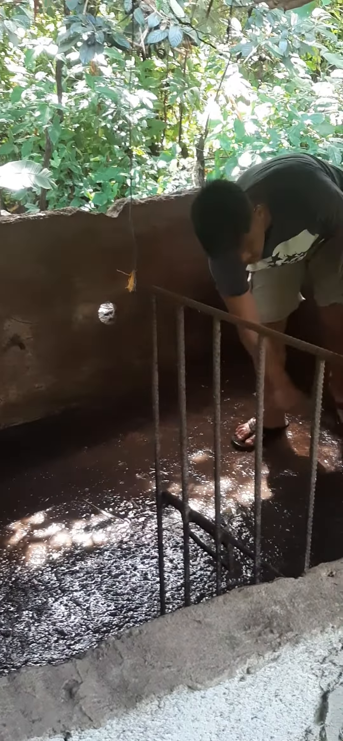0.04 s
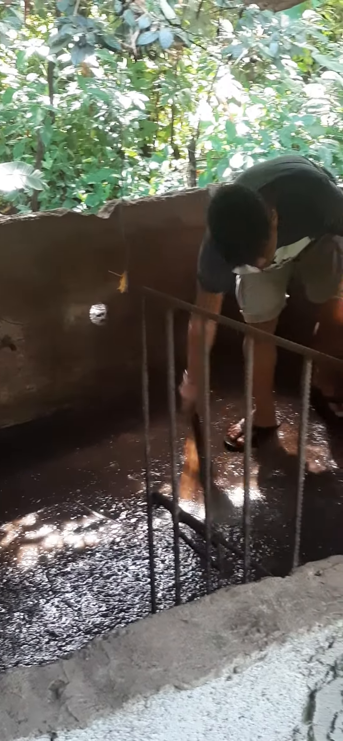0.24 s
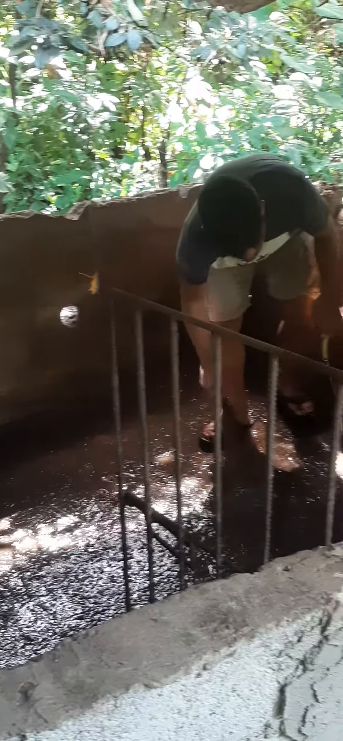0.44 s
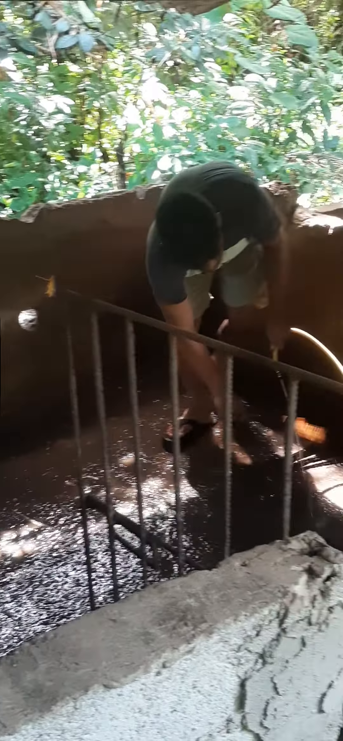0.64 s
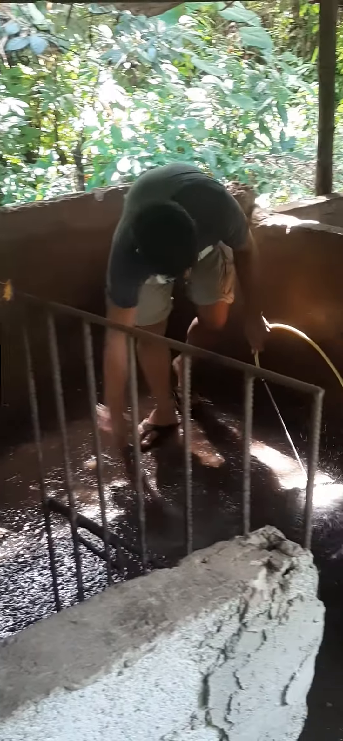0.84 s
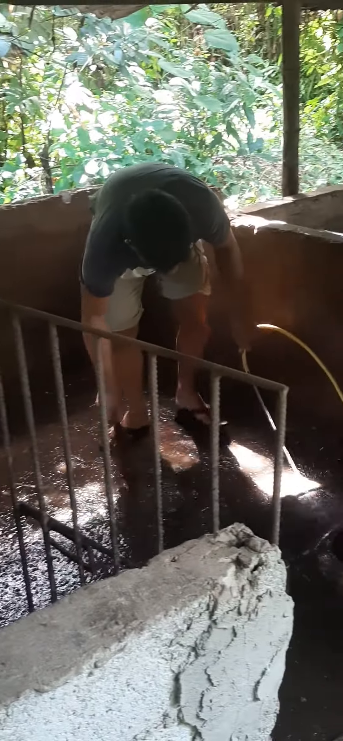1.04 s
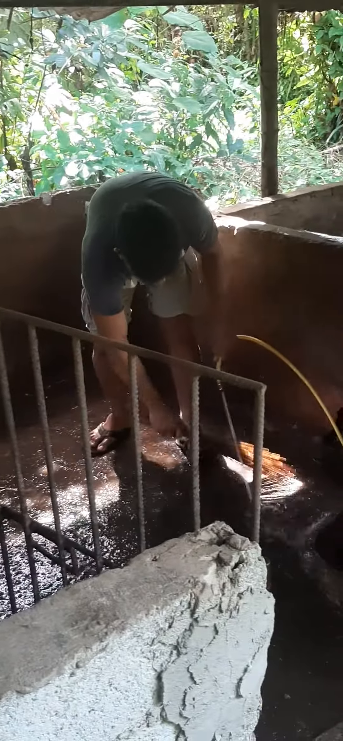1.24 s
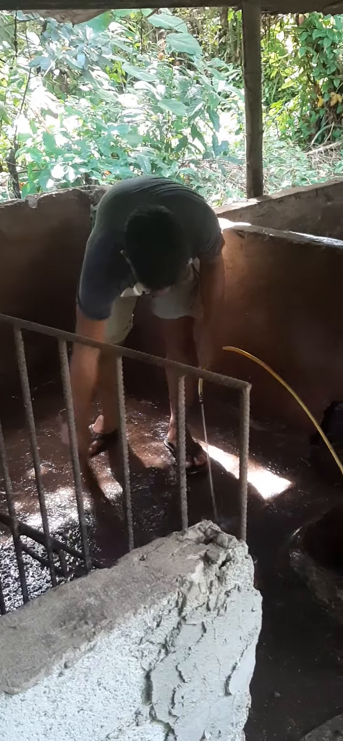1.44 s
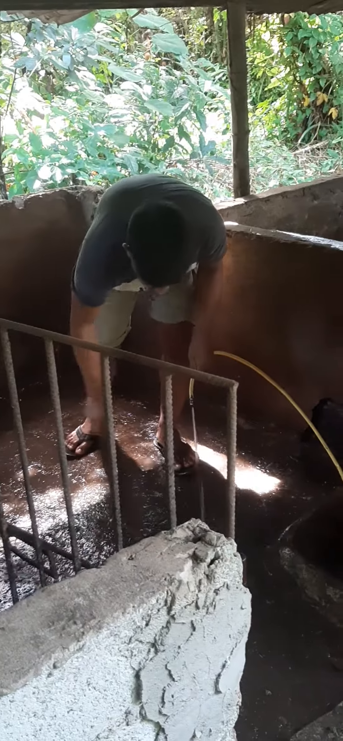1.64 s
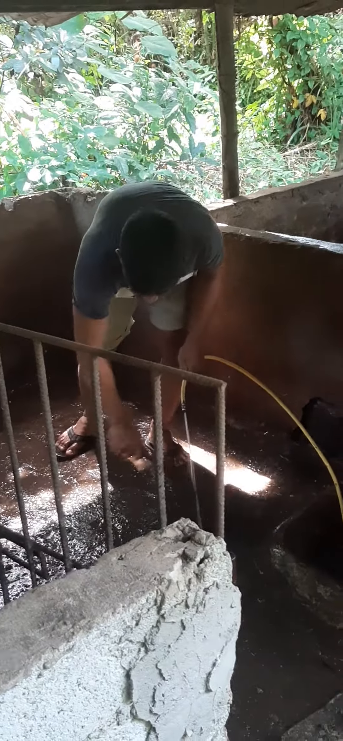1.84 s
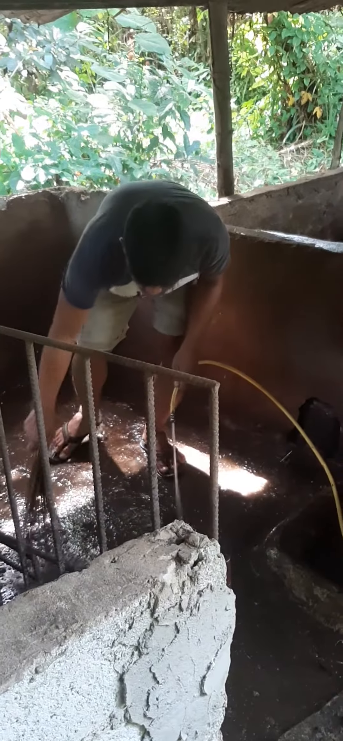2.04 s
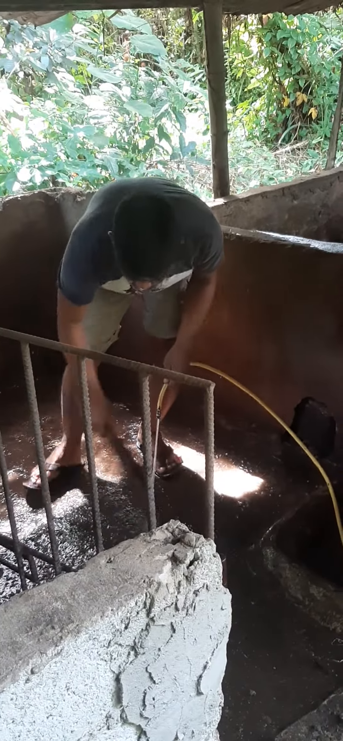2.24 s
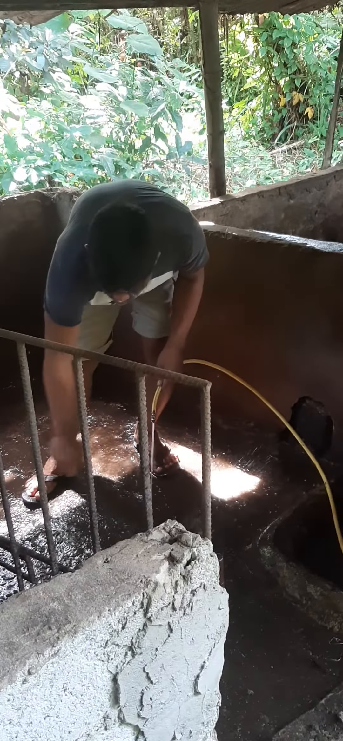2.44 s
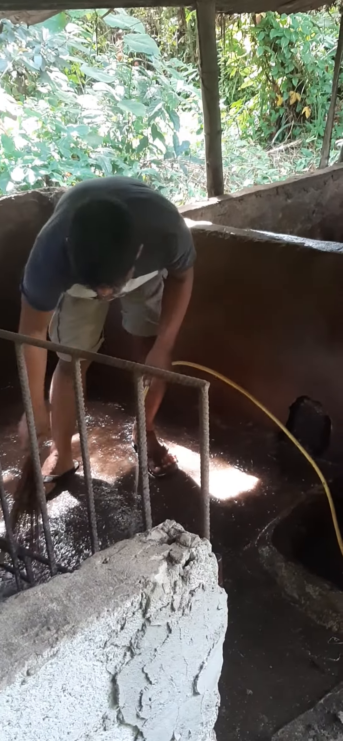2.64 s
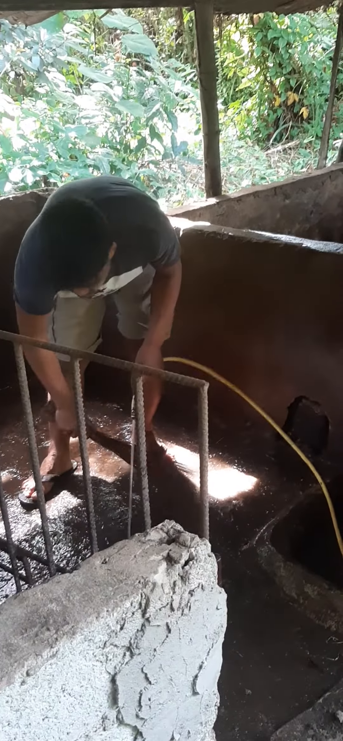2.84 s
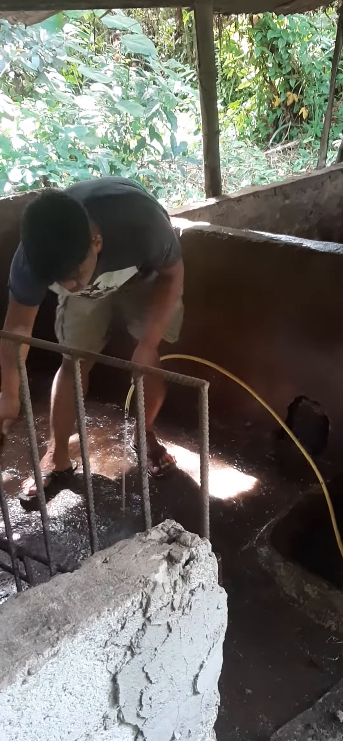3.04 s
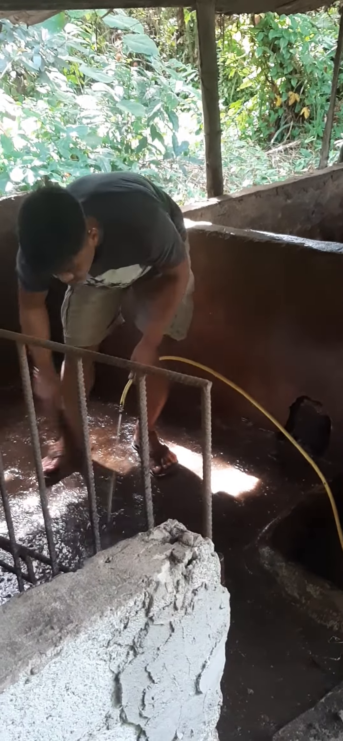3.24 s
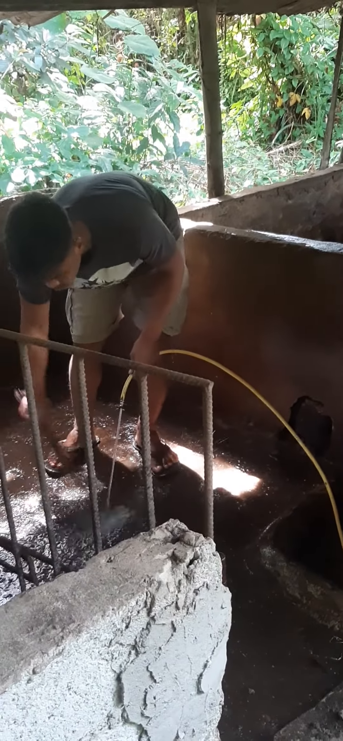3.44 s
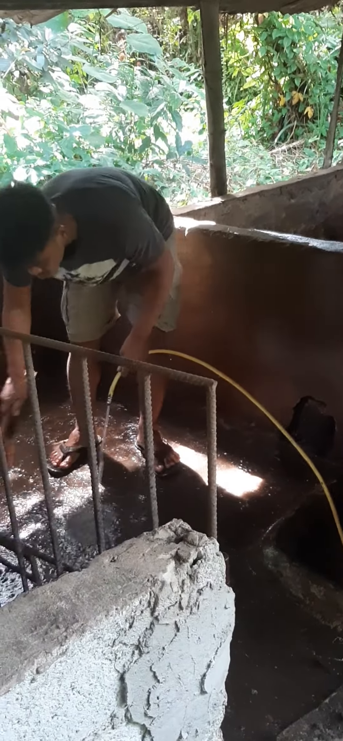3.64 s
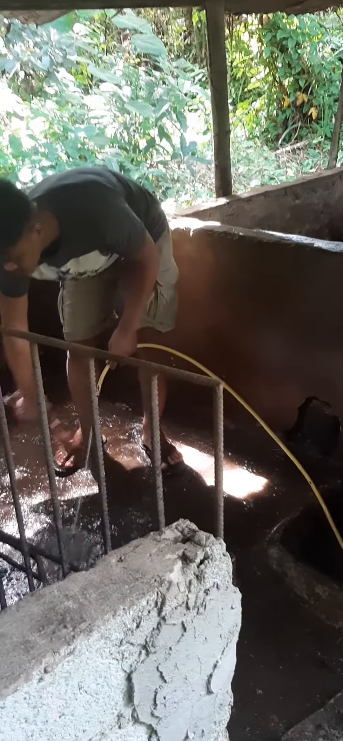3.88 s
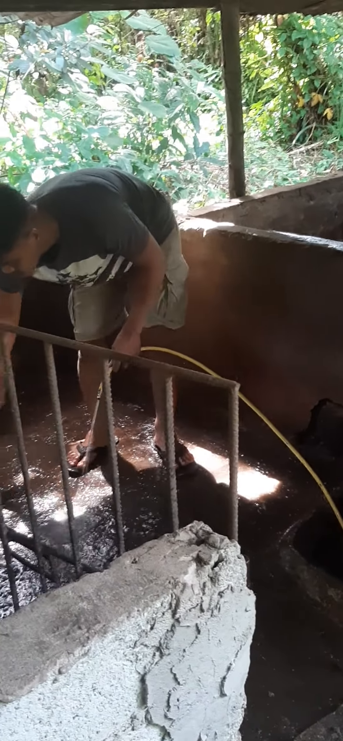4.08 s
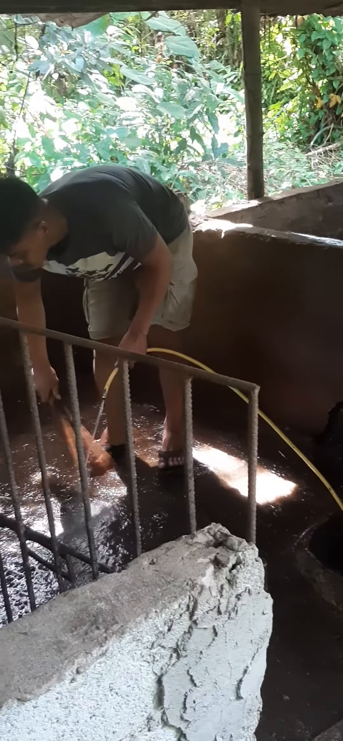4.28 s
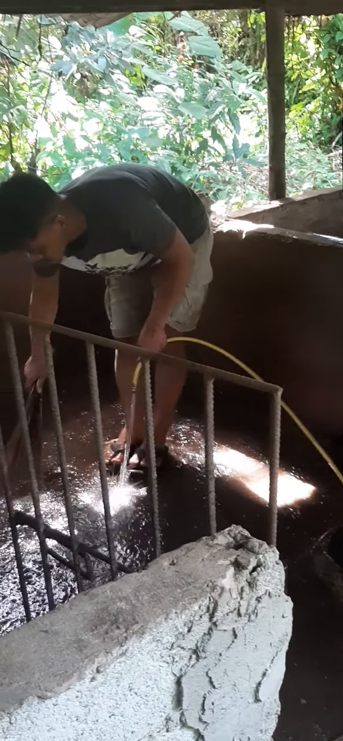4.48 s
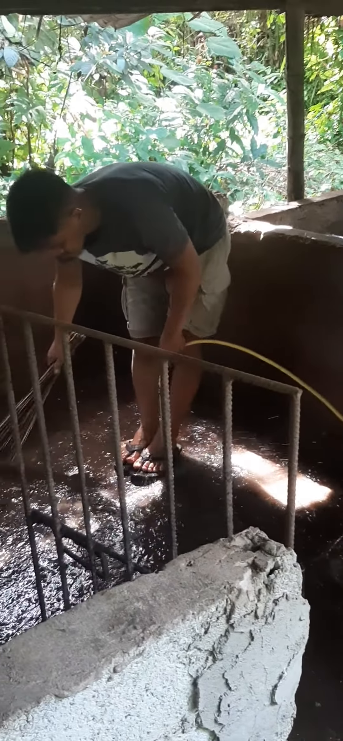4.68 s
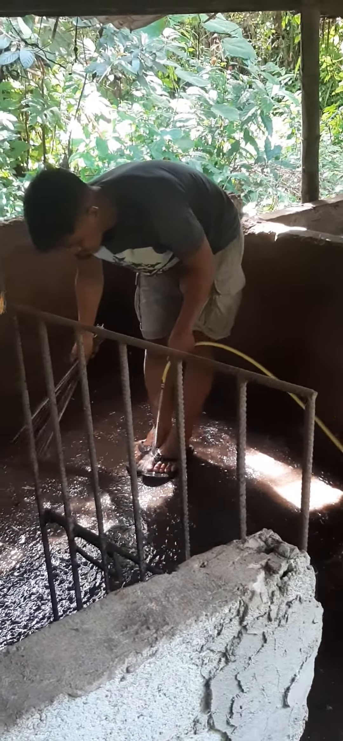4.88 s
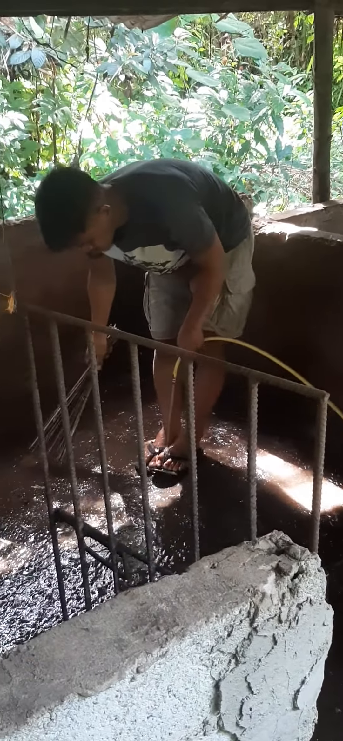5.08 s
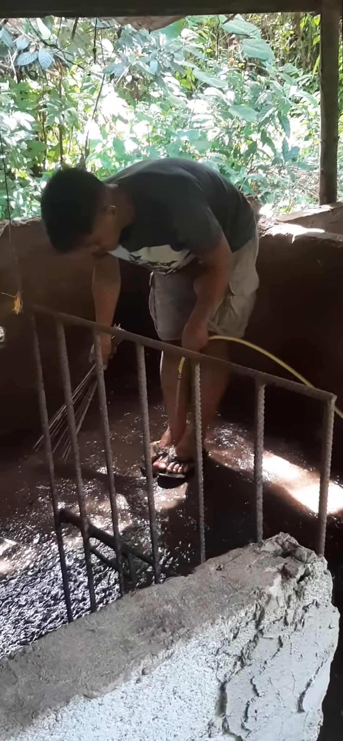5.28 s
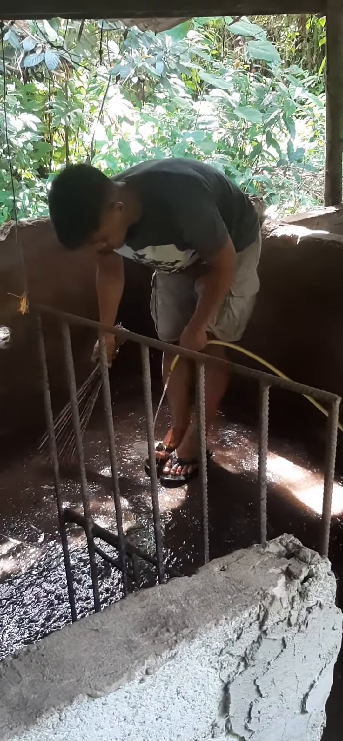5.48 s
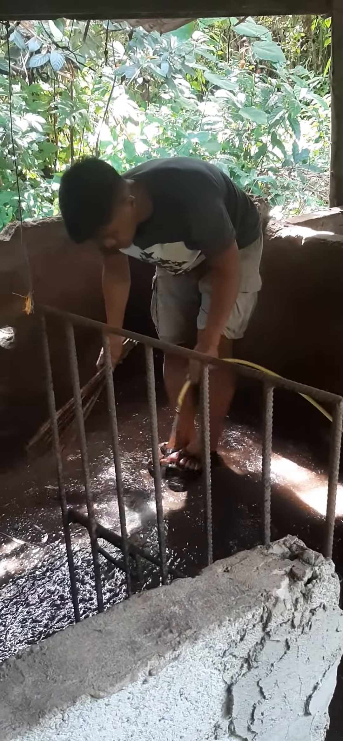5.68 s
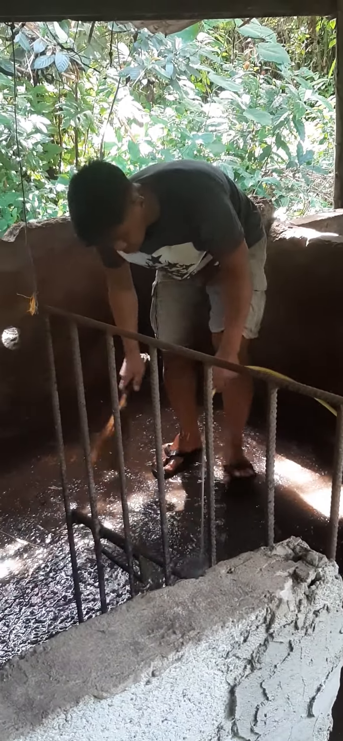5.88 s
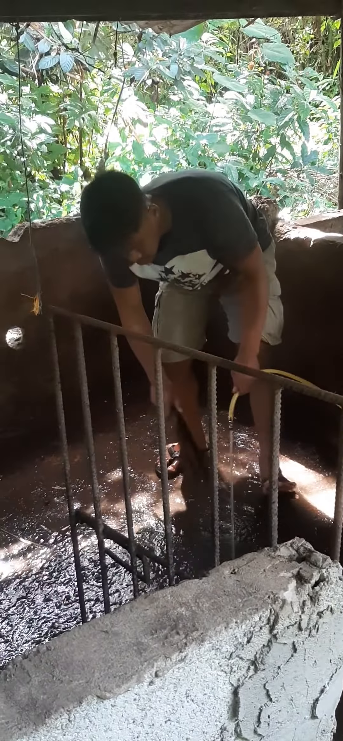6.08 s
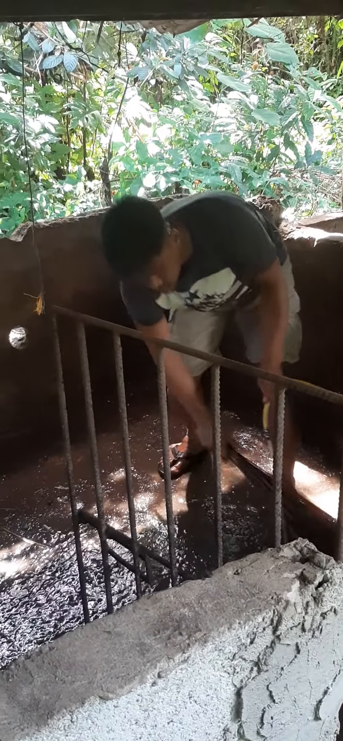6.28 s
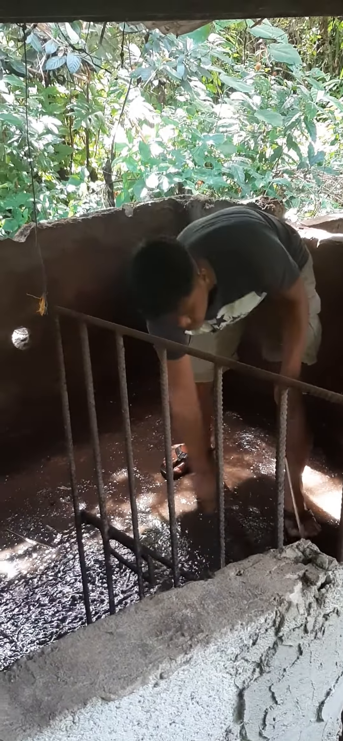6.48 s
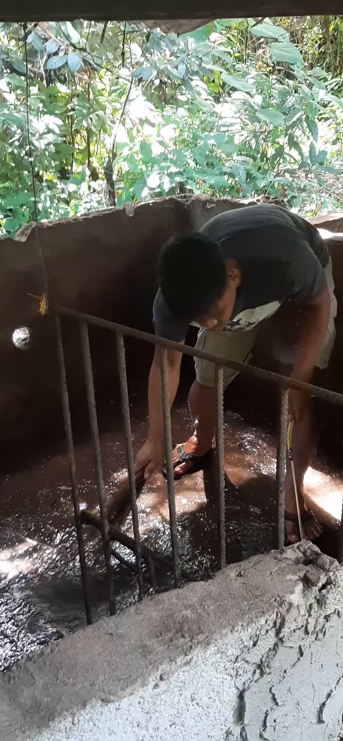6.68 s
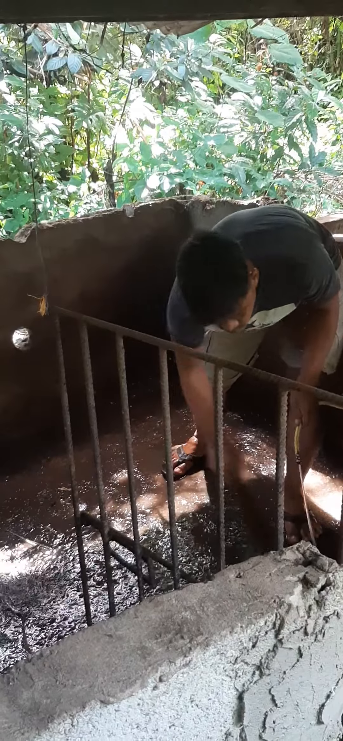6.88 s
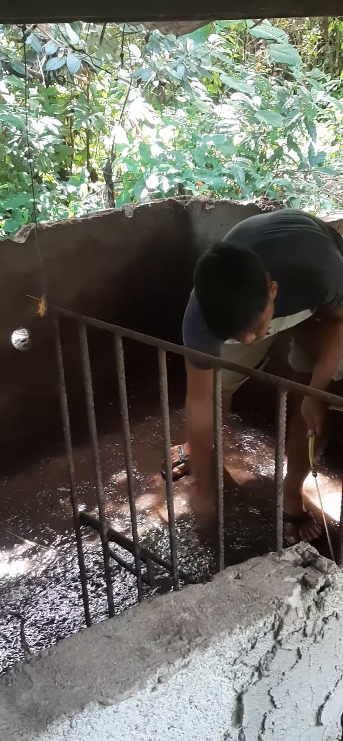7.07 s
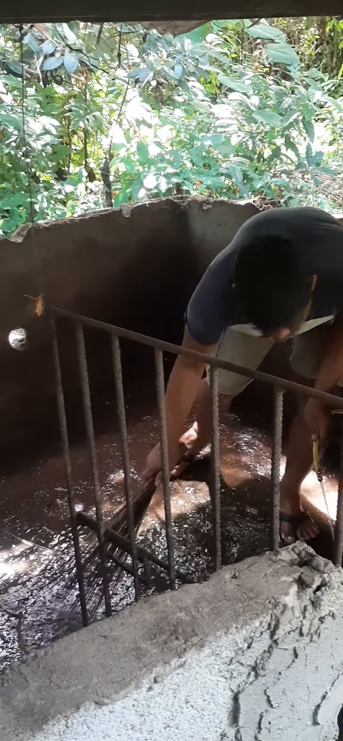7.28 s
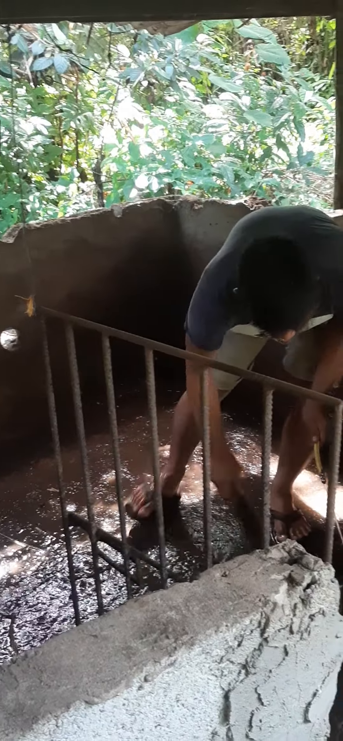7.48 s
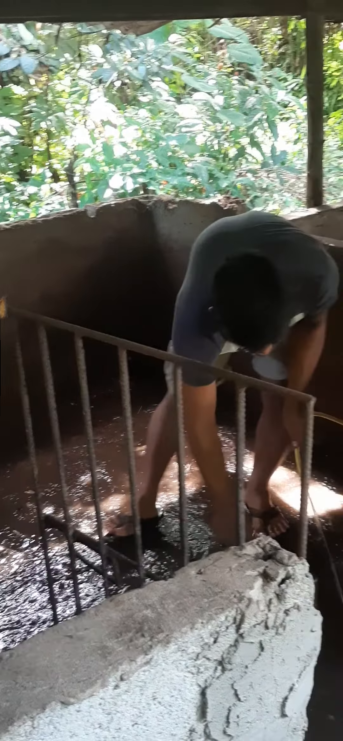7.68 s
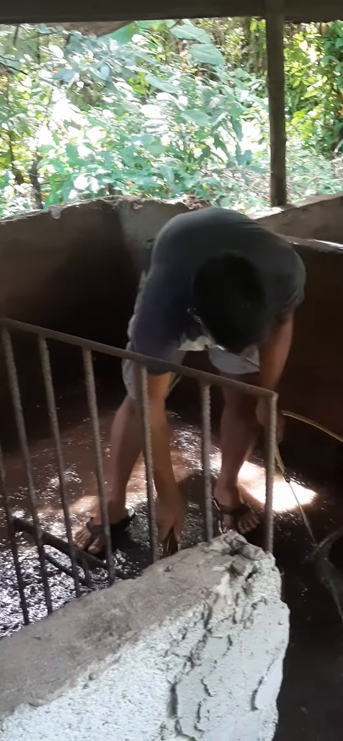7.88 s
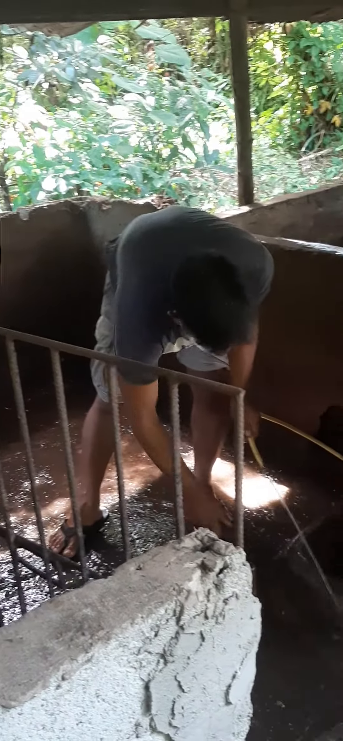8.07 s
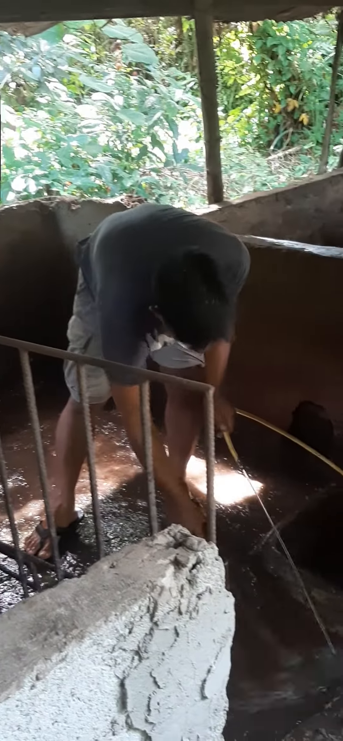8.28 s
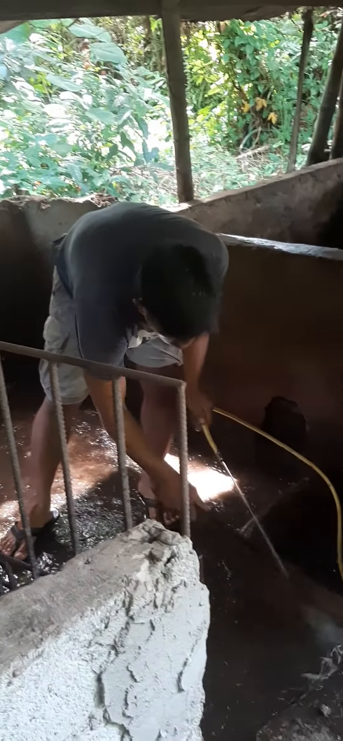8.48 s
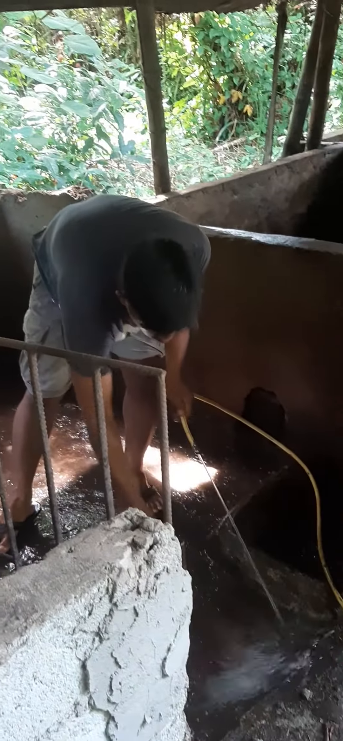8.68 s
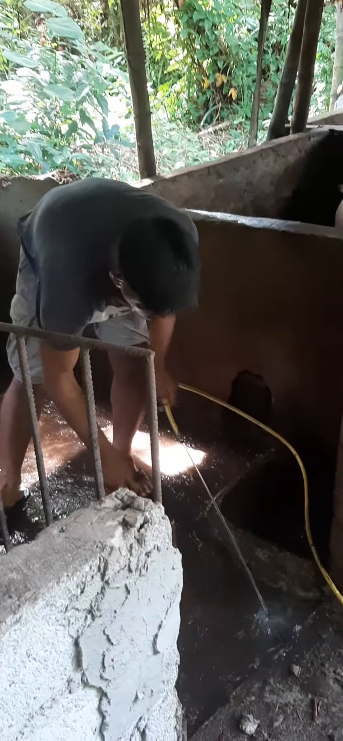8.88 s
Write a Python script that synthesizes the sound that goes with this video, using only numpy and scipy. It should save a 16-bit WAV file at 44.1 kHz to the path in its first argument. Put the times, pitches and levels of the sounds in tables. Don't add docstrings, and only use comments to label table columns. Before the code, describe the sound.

A stick broom scrubs wet concrete inside a small hard-walled pen, close to a handheld stereo microphone. From 0 to 4.6 s come nine dry, bright, hissing strokes, first about 0.6 s apart, then nearer 0.5 s; each swells fast and fades into a scrape, some with a soft return brush between. Low air puffs bump the left side on some strokes. Beneath runs a constant pump hum near 120 Hz, its casing ringing with a fast mechanical rattle, plus dull hose drumming, fine spray and a faint high insect hiss. From about 4.7 to 6.4 s the broom stops; the background rises strongly, peaking near 6.2 s, with hollow jet booms on the wall and low thuds around 5.9 and 6.04 s. It drops abruptly as strokes return at 6.45, 6.97, 7.7, 8.15 and 8.6 s, with another water boom near 8.1 s.

```python
import sys
import numpy as np
from scipy import signal
from scipy.fft import rfft, irfft, next_fast_len
from scipy.io import wavfile

SR = 44100
rng = np.random.default_rng(int(sys.argv[2]) if len(sys.argv) > 2 else 0)


def unload_audio(sound):
    columns = np.transpose(np.atleast_2d(sound))
    steps = np.round(np.clip(columns, -1, 1) * 32767)
    wavfile.write(sys.argv[1], SR, steps.astype(np.int16))


def invert_db(x):
    u = np.asarray(x, float) / 20
    return 10 ** u


N = 393372
HZ = np.fft.rfftfreq(next_fast_len(N), 1 / SR)
T = np.arange(N) / SR
SLOW_T = T[::64]
SHAFT_HZ = 29.39

# (time [s], level [dB])
GAIN = [(0.0, -45), (0.45, -48), (1.3, -47), (2.2, -46), (3.2, -46), (3.8, -46), (4.9, -46.5), (5.3, -44.5),
        (5.75, -40.5), (6.2, -36), (6.48, -37), (6.58, -46.5), (6.95, -45.5), (7.5, -46.5), (8.0, -45),
        (8.92, -44)]
# (frequency [Hz], level [dB])
HUM_TONES = [(119.6, 0.5), (149.8, -17.5), (179.5, -15.5), (241, -18), (323, -15)]
CASING_HZ = [479, 530, 612, 802, 860, 960, 1320, 1502, 1853, 1890, 1965, 2013, 2050, 2095, 2480, 2750, 2950,
             3612, 4225]
# (width [Hz], level [dB], left over right [dB], left-right lag [rad])
CASING_MODES = [(14, -14.5, -14, 0.3), (57.4, -14, -6, 1), (16.8, -8, -9.5, 1.5), (15.2, -4, 4, -3),
                (18, -11, 12.5, -2.5), (45, -23.5, 22.5, 2.5), (19.7, -23, 29.5, -3), (15, -5.5, 4, -5),
                (25.2, -4.5, 1, 1.04), (40, -6.5, 5, 2.5), (40, -4, -15, 2.5), (39.6, -2.5, -13.5, 0.76),
                (30, -1, 4, -2.5), (50, -11, -9, 1.3), (70, -10.5, 2, 2.15), (66.5, -5.5, -9, 0.4),
                (146, -15, 0, 0.9), (60, -5, 1.5, 2), (170, -13, 3, 1.46)]
# (frequency [Hz], density [dB per Hz])
WATER_COLOUR = [(60, -12), (150, 7), (280, -16), (340, 6), (520, -1), (720, -0.5), (900, 0.5), (1080, 1),
                (1500, 3.5), (3000, -3), (3880, -7), (4600, -24), (6000, -33)]
# (frequency [Hz], likeness [0 to 1])
WATER_LIKENESS = [(60, 0.51), (130, 0.79), (320, 0.57), (500, 1), (1100, 0.16), (2500, 0.2)]
# (frequency [Hz], density [dB per Hz])
SPRAY_COLOUR = [(3000, -9), (3850, 11), (5000, -2), (6300, 7), (8000, 21), (9500, -33), (12000, -4),
                (17000, 7)]
# (frequency [Hz], width [Hz], level [dB])
INSECT_BANDS = [(7100, 200, -6), (7610, 260, 5), (8300, 130, -1)]
# (frequency [Hz], density [dB per Hz])
RUMBLE_COLOUR = [(15, -25), (35, -17), (55, -6), (90, 2.5), (140, -20.5)]
# (time [s], half length [s], hum change [dB], rumble swell [dB])
GUSTS = [(0.2, .12, -4, 10), (0.82, .12, -4, 12), (1.45, 0.13, -3, 4), (1.97, .08, -4, 2),
         (2.51, .06, -1, 2), (3.02, .09, -5, 6), (3.53, 0.14, -5, 7), (4.02, 0.083, -3, 4),
         (4.58, .06, 1, 8), (5.95, .15, 1.5, 5), (6.33, 0.091, 1, 9), (6.6, 0.073, -3, 1),
         (7.13, .1, -2, 3), (7.62, .06, 2, 5), (7.73, .04, -1.5, 8), (8.15, 0.22, -1.5, 8)]
# (time [s], half length [s], drumming swell [dB], boom swell [dB])
JET_SWINGS = [
    (5.3, .15, 1.5, 2),
    (5.93, 0.21, 2, 6),
    (6.15, 0.24, 2.5, 15),
    (7.12, .08, -1.5, 6),
    (7.97, .07, 2, 9),
    (8.12, 0.19, 1.5, 11.5),
]
# (frequency [Hz], density [dB per Hz])
HISS_COLOUR = [(4000, -41), (7000, -7.5), (9000, -5), (11300, 8.5), (13000, 4.5), (14500, 3.5),
               (16000, -4.5)]
# (frequency [Hz], density [dB per Hz])
SCRAPE_COLOUR = [(2000, -54), (3800, -2.5), (4600, 2), (7500, -1), (9000, -1), (12000, -27)]
# (frequency [Hz], density [dB per Hz])
STICKS_COLOUR = [(500, -47), (1300, -13.5), (2000, -2.5), (3000, 0), (3700, -7), (6000, -38)]
# (touch-down [s], rise [s], fall [s], peak [dB], fall shape [2 round, 4 flat-topped])
STROKES = [(0.06, 0.088, 0.23, -24, 5.3), (0.683, 0.12, .23, -23.5, 2.55), (1.305, 0.1, .25, -23, 1.45),
           (1.872, .12, 0.19, -23.5, 2.6), (2.412, 0.12, 0.17, -22.5, 1.86),
           (2.915, 0.057, 0.19, -23, 2.65), (3.408, 0.12, 0.13, -22, 2.4), (3.885, 0.16, 0.14, -22.5, 1.3),
           (4.352, 0.055, 0.2, -28, 2), (6.446, 0.045, .25, -23.5, 4.5), (6.965, 0.19, 0.17, -23.5, 2.3),
           (7.697, 0.043, 0.19, -24.5, 4.3), (8.143, 0.15, 0.11, -28, 1.9), (8.6, 0.11, 0.12, -24, 1.2)]
# (touch-down [s], peak [dB])
RETURNS = [
    (-0.06, -46),
    (1.725, -35.5),
    (2.28, -31.5),
    (2.79, -40.5),
    (3.28, -38.5),
    (3.74, -38),
    (7.58, -36.5),
    (8.48, -36.5),
]
# (time [s], half length [s], hiss change [dB], scrape change [dB], sticks change [dB])
LEANS = [(0.15, .05, 2, -1, 2), (0.70, .02, 3, 2.5, 7), (0.80, 0.066, 1, -2.5, -3.5),
         (1.44, 0.081, 0.5, 1, 4), (1.55, 0.064, 4.5, 6.5, 6.5), (1.98, .08, 1.2, 0.5, .6),
         (2.52, .03, 1, -2, 0), (2.97, .03, 0, 2.5, 3.5), (3.285, .006, 9, 5, 6), (3.95, 0.077, -0.5, 3, 4),
         (4.09, .04, -4.5, -3.5, 1.5), (4.38, 0.043, 2.5, 2.5, 7.5), (6.372, .005, 10, -6, -3),
         (6.5, .03, 0, 1.5, 8.5), (6.56, .025, 2, -6, -6), (6.65, 0.078, -2.5, 3, 9),
         (7.015, 0.024, -5, -12, 2), (7.2, 0.06, -1.5, 1.5, 1.5), (7.72, .015, 3, -2, -5),
         (7.82, 0.06, -2.5, -1.5, 1.5), (8.11, .006, 7, 12, 5), (8.68, .03, 3.5, 1.5, 2)]
# (time [s], peak [dB])
PUFFS = [(0.15, -39), (0.159, -35), (0.182, -38), (0.242, -39), (0.792, -31.5), (.83, -40), (1.42, -41),
         (1.97, -40), (2.499, -46), (2.518, -31.5), (3.03, -40), (3.549, -41), (3.986, -29.5), (7.725, -34)]
# (time [s], peak [dB], pitch [Hz], half length [s])
BUMPS = [
    (1.27, -52, 65, .02),
    (2.707, -41, 85, 0.015),
    (3.912, -44, 90, .012),
    (4.59, -53, 60, .02),
    (5.665, -49, 65, .02),
    (5.89, -40, 75, .05),
    (6.04, -40, 62, 0.056),
    (6.585, -49, 60, .02),
    (7.616, -51, 60, .03),
    (8.126, -47, 60, 0.036),
]
# (frequency [Hz], gain [dB])
PORT_RESPONSE = [(6000, 1), (8000, 0.5), (8380, -9), (8850, -9.5), (9200, -3), (10500, -3), (15750, 5),
                 (15950, -37)]


def evened(x):
    return x / np.sqrt(np.mean(x ** 2) + 1e-20)


def read(points, hz=HZ):
    f, value = np.transpose(points)
    return np.interp(np.log(hz + 1), np.log(f + 1), value)


def filtered(x, response):
    size = next_fast_len(N)
    return irfft(rfft(x, size) * response, size)[..., :N]


def mode(hz, width):
    return 1 / (1 + 2j * (HZ - hz) / width)


def wander(hz):
    coarse = rng.standard_normal(N // 64 + 2)
    f = np.fft.rfftfreq(len(coarse), 64 / SR)
    smooth = irfft(rfft(coarse) / (1 + (f / hz) ** 2), len(coarse))
    return evened(np.interp(T, np.arange(len(coarse)) * 64 / SR, smooth))


def noise_pair(same):
    a, b = rfft(rng.standard_normal((2, next_fast_len(N))))
    same = np.clip(same, 0, 1)
    right = same * a + np.sqrt(1 - same ** 2) * b
    return irfft([a, right], next_fast_len(N))[:, :N]


def power_sum(levels_db):
    return 10 * np.log10(np.sum(invert_db(np.asarray(levels_db)) ** 2, axis=0))


def swells(rows):
    s, half, *columns = np.transpose(rows)
    bump = np.exp(-2 * ((SLOW_T[:, None] - s) / half) ** 2)
    return [np.interp(T, SLOW_T, bump @ c) for c in columns]


def hum():
    tones = np.zeros(N)
    for hz, db in HUM_TONES:
        phase = 2 * np.pi * hz * T + 0.12 * wander(5.2) + 6 * rng.random()
        tones += invert_db(db + 0.36 * wander(9.1)) * np.sin(phase)
    return np.sqrt(2) * tones * invert_db(np.array([[1.4], [-1.6]]))


def casing():
    turn = 2 * np.pi * SHAFT_HZ * T + 0.38 * wander(2.02)
    throb = 1 + 0.12 * np.cos(turn) + 0.05 * np.cos(2 * turn)
    knocks = np.diff(np.floor(turn / (2 * np.pi)), prepend=0)
    drive = throb * noise_pair(0.85) + 0.3 * evened(knocks)
    side = np.array([[.5], [-.5]])
    body = 0
    for hz, (width, db, pan_db, lag) in zip(CASING_HZ, CASING_MODES):
        body = body + invert_db(db + side * pan_db) * abs(mode(hz, width)) ** 2 * np.exp(-1j * side * lag)
    return evened(filtered(drive, body))


def water():
    beat = 1 + 0.11 * np.cos(4 * np.pi * SHAFT_HZ * T)
    gusts = invert_db(0.95 * wander(32)) * beat
    return evened(filtered(gusts * noise_pair(read(WATER_LIKENESS)), invert_db(read(WATER_COLOUR))))


def air():
    return evened(filtered(invert_db(1.1 * wander(11)) * noise_pair(0.94), invert_db(read(RUMBLE_COLOUR))))


def wall():
    boom = abs(mode(243, 41)) ** 2 + 0.74 * abs(mode(319, 50)) ** 2 + 0.43 * abs(mode(216, 55)) ** 2
    return evened(filtered(noise_pair(0.82), boom))


def spray():
    return evened(filtered(invert_db(2.7 * wander(30)) * noise_pair(0.), invert_db(read(SPRAY_COLOUR))))


def insects():
    band = sum(invert_db(db) * abs(mode(hz, width)) ** 2 for hz, width, db in INSECT_BANDS)
    chorus = evened(filtered(invert_db(0.61 * wander(28)) * noise_pair(0.043), band))
    return chorus * invert_db(np.array([[1.1], [-1.1]]))


def effort():
    return_rise_s, return_fall_s, return_square = 0.092, 0.075, 1.65
    rows = STROKES + [(s, return_rise_s, return_fall_s, db, return_square) for s, db in RETURNS]
    touch, rise, fall, peak_db, square = np.transpose(rows)[:, :, None]
    since = SLOW_T - touch - rise
    along = np.clip(since / np.where(since < 0, rise, fall), -2, 2)
    rising_db = -14 * abs(along) ** 2.36
    falling_db = -23 * abs(along) ** square
    stroke_db = peak_db + np.where(since < 0, rising_db, falling_db)
    land_s = np.repeat([0.0097, 0.06], [len(STROKES), len(RETURNS)])[:, None]
    stroke_db = stroke_db + 20 * np.log10(np.clip((SLOW_T - touch) / land_s, 1 / N, 1))

    rest_db = np.interp(SLOW_T, *np.transpose(GAIN)) - 1.5
    hiss = power_sum([*stroke_db, rest_db])
    scrape = power_sum([*(stroke_db - 6.5 + 2.5 * along), rest_db - 1.5])
    sticks = power_sum([*(stroke_db - 16.5 + 1 * along), rest_db + 0.5])
    stroke_pan_db, rest_pan_db = 0.1, 1
    pan = stroke_pan_db + (rest_pan_db - stroke_pan_db) * invert_db(rest_db - hiss) ** 2

    hiss, scrape, sticks, pan = [np.interp(T, SLOW_T, c) for c in (hiss, scrape, sticks, pan)]
    lean_hiss, lean_scrape, lean_sticks = swells(LEANS)
    hiss = hiss + lean_hiss
    return hiss, scrape + lean_scrape - hiss, sticks + lean_sticks - hiss, pan


def pen(x, t60=0.073, wet_db=-6):
    t = np.arange(SR // 8) / SR
    taps = rng.standard_normal((2, len(t))) * invert_db(-60 * t / t60) * (t > .002)
    taps /= np.linalg.norm(taps, axis=1)[:, None]
    return x + invert_db(wet_db) * signal.oaconvolve(x, taps, axes=1)[:, :N]


def broom():
    hiss_db, scrape_db, sticks_db, pan_db = effort()
    slips_per_s = 9000
    chance, size = rng.uniform(-1, 1, (2, N)), rng.exponential(1, (2, N))
    slips = (abs(chance) < slips_per_s / SR) * np.sign(chance) * invert_db(1.64 * np.minimum(size, 4))
    slips[1] += 0.2 * np.roll(slips[0], 17)
    hiss = evened(filtered(slips, invert_db(read(HISS_COLOUR))))
    scrape = evened(filtered(slips, invert_db(read(SCRAPE_COLOUR))))
    sticks = evened(filtered(slips, invert_db(read(STICKS_COLOUR))))
    dry = invert_db(hiss_db + 0.13 + 1.0 * wander(46)) * hiss
    dry += invert_db(hiss_db + scrape_db + 1.16 * wander(19)) * scrape
    dry += invert_db(hiss_db + sticks_db + 1.0 + 2.3 * wander(37)) * sticks
    return pen(dry) * invert_db(np.outer([.5, -.5], pan_db))


def puffs():
    out, t = np.zeros(N + SR), np.arange(SR // 16) / SR
    cycles = 40 * t + 1.05 * (1 - np.exp(-t / .005))
    pop = -np.sin(2 * np.pi * cycles) * np.exp(-t / .014) * (1 - np.exp(-t / .001))
    tick = np.sin(2 * np.pi * 850 * t) * np.exp(-((t - .0035) / 0.0014) ** 2)
    pop = pop + 0.73 * tick
    for s, db in PUFFS:
        out[round(s * SR):][:len(t)] += invert_db(db + 1.5) * pop
    return out[:N] * invert_db(np.array([[.1], [-18.]]))


def bumps():
    s, db, hz, half = np.transpose(BUMPS)[:, :, None]
    since = SLOW_T - s
    thuds = invert_db(db) * np.exp(-2 * (since / half) ** 2) * np.cos(2 * np.pi * hz * since)
    return signal.resample_poly(thuds.sum(0), 64, 1)[:N] * invert_db(np.array([[1.2], [-1.2]]))


def scene():
    gain_db = np.interp(T, *np.transpose(GAIN))
    duck_db, gust_db = swells(GUSTS)
    drum_db, boom_db = swells(JET_SWINGS)
    behind = invert_db(duck_db) * hum()
    behind = behind + invert_db(11.0) * casing()
    behind += invert_db(1.04 + drum_db) * water()
    behind += invert_db(-13.5 + gust_db) * air()
    behind += invert_db(-18.5 + boom_db + 0.4 * gust_db) * wall()
    behind += invert_db(-5.5 - 0.6 * (gain_db + 44)) * spray()
    behind += insects()
    return invert_db(gain_db) * behind + broom() + puffs() + bumps()


def band_limit(x):
    return signal.sosfilt(signal.butter(12, 15790, fs=SR, output="sos"), x)


def record(dry):
    heard = filtered(dry, invert_db(read(PORT_RESPONSE)))
    mix = 0.95 * np.tanh(heard / 0.84)
    return band_limit(mix)


dry = scene()
out = record(dry)
unload_audio(out)
```